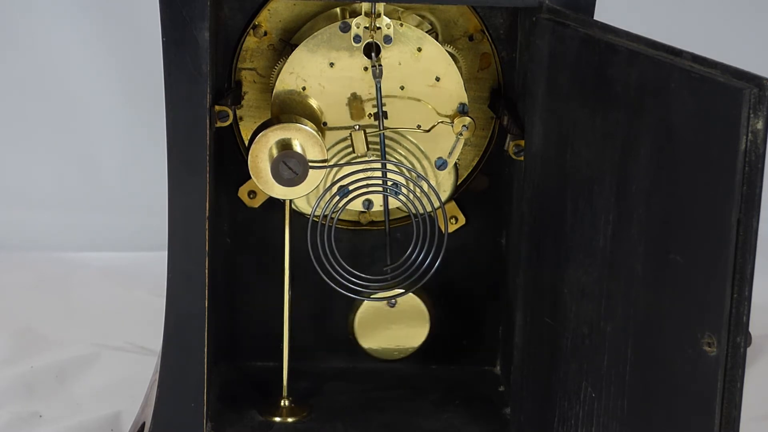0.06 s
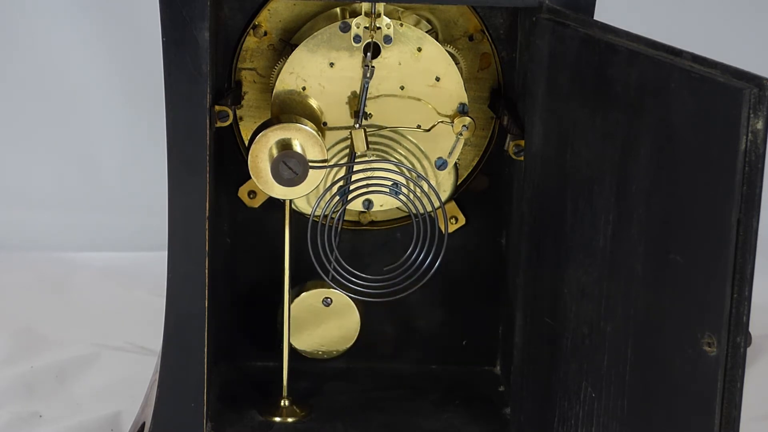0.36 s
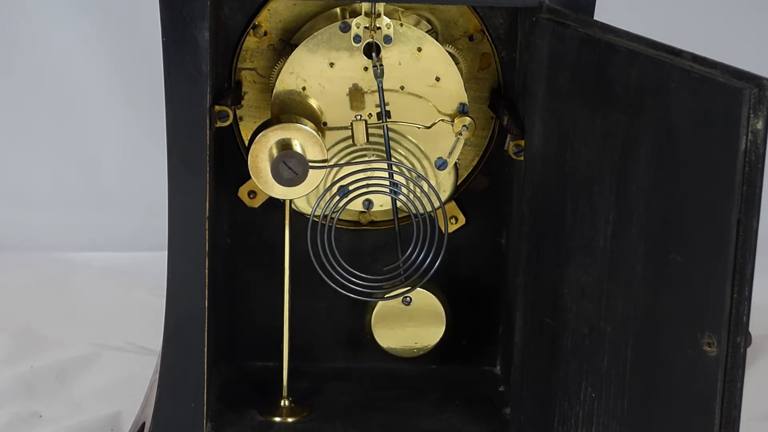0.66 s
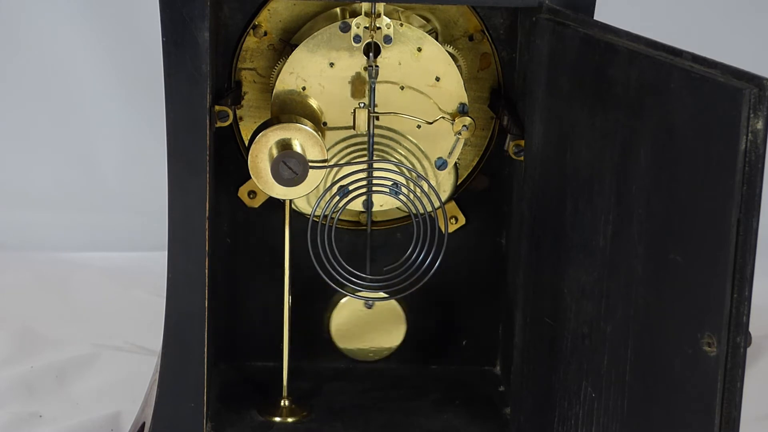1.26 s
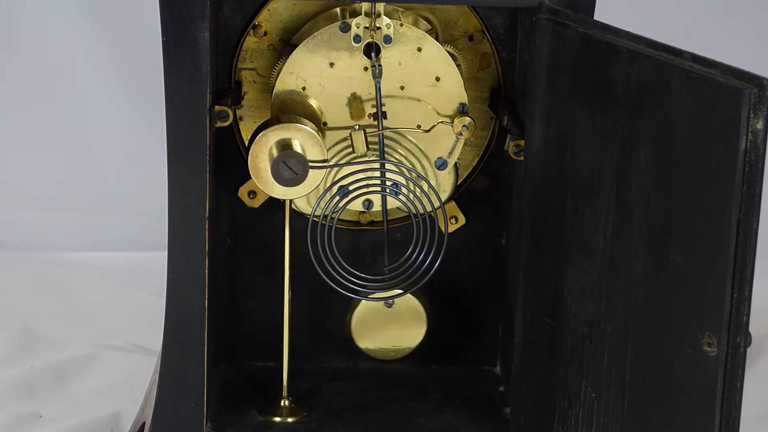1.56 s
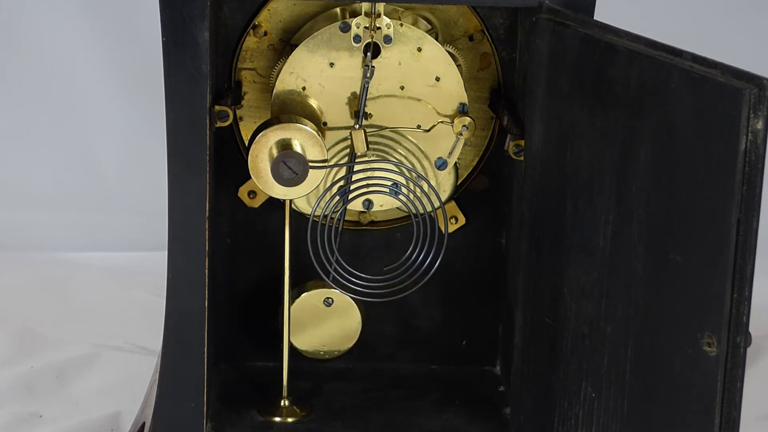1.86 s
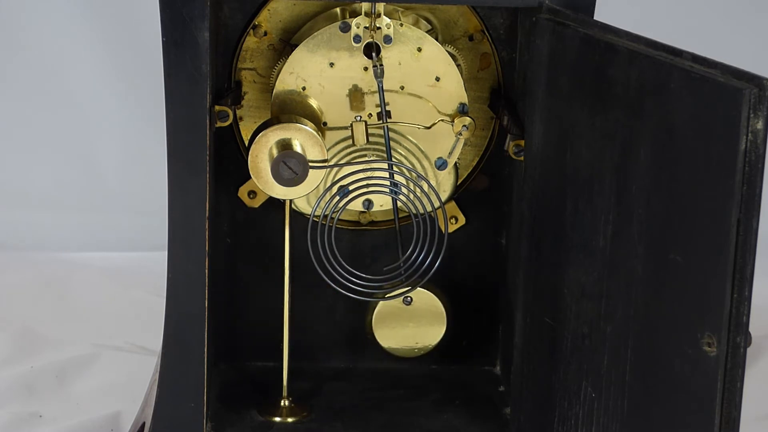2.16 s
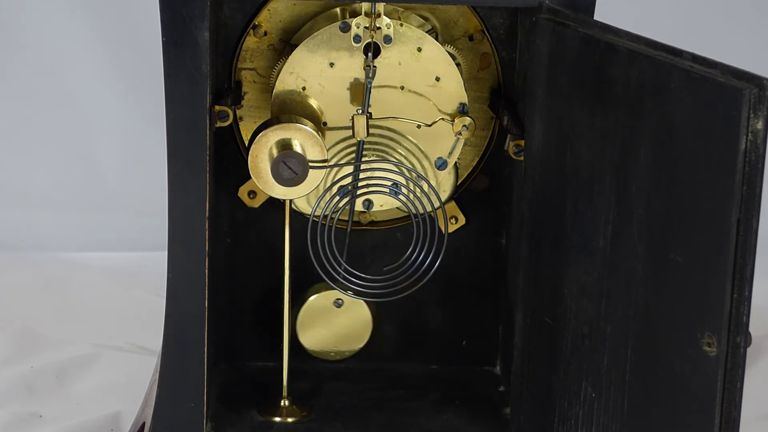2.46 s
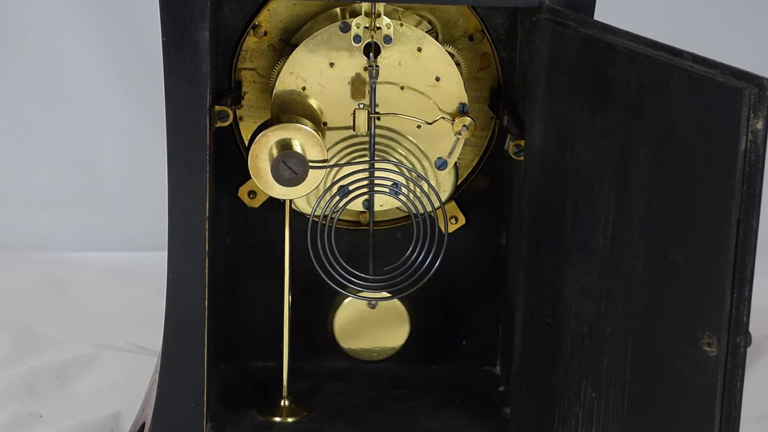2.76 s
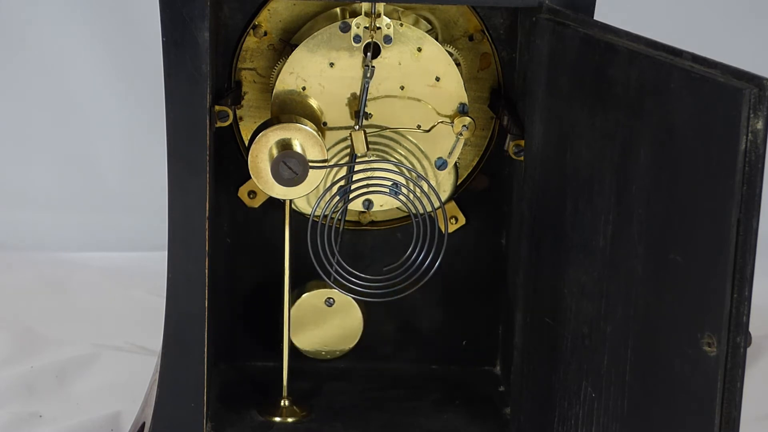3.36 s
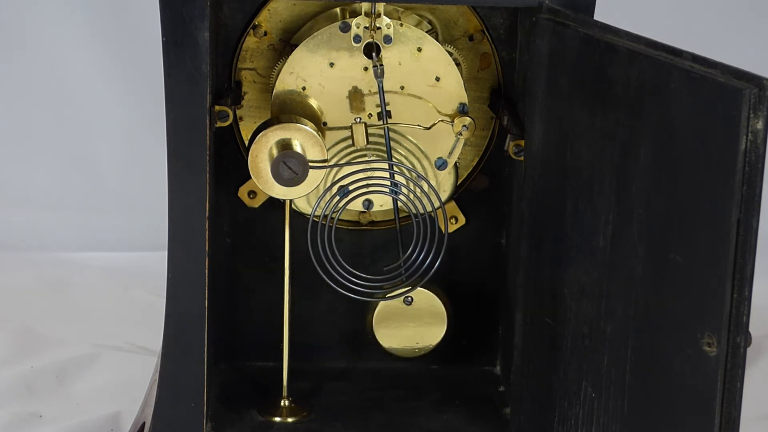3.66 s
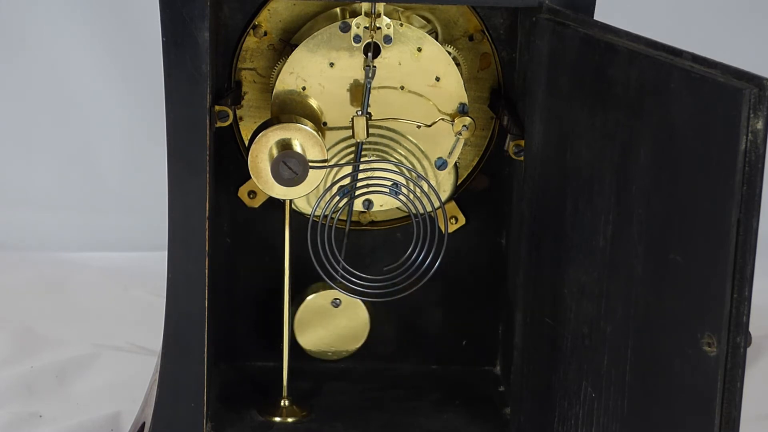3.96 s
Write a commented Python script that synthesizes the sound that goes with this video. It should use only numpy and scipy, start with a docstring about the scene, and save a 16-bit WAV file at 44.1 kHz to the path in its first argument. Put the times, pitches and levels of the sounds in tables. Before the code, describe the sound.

A mantel clock strikes on a coiled steel gong, already ringing, then hit twice more. A sharp lever clack follows each blow, while the mechanism whirrs and ticks quickly, close up in a small room.

```python
"""A small room, close to the open back of a mantel clock striking the hour.
The brass striking train whirrs and ticks quickly throughout. A coiled steel gong, already ringing,
takes two more blows from a padded hammer. Each blow adds to the ringing partials, thuds and thumps
the wooden case. Just after it the hammer lever clacks and a low hum swells briefly."""
import sys
import numpy as np
from scipy import signal
from scipy.fft import rfft, irfft
from scipy.io import wavfile
from scipy.ndimage import uniform_filter1d

SR = 44100
rng = np.random.default_rng(int(sys.argv[2]) if len(sys.argv) > 2 else 0)


def waveform_to_disk(signal):
    """Save audio, clipped to [-1, 1], as 16-bit WAV at the path in sys.argv[1]."""
    frames = np.transpose(np.atleast_2d(signal))
    scaled = np.clip(frames, -1, 1) * 32767
    samples = np.round(scaled).astype(np.int16)
    wavfile.write(sys.argv[1], SR, samples)


N = 176400


def undb(db):
    return 10 ** (np.asarray(db) / 20)


def unit_rms(x):
    return x / np.sqrt(np.mean(x ** 2))


def fade(t, t60_s):
    """Exponential decay from t = 0, silent before."""
    return (t >= 0) * np.exp(-np.log(1000) * np.maximum(t, 0) / t60_s)


def rise(t, rise_s):
    """Exponential build-up from t = 0."""
    return 1 - np.exp(-np.maximum(t, 0) / rise_s)


def wander(rate_hz):
    """Smooth random drift, rms 1."""
    hold = int(SR / rate_hz)
    steps = np.repeat(rng.standard_normal(N // hold + 1), hold)
    return unit_rms(uniform_filter1d(steps, hold)[:N])


# Stereo width of the noises. Each row: frequency in Hz, side-to-mid ratio in dB.
WIDTH = [(50, -11), (250, -11.5), (1500, -17), (4000, -4.5), (8000, -9.5), (12000, -4.5)]


def colour(pair, spectrum, resonances=()):
    """Shape a mid/side pair by a spectrum and resonances into left and right, rms 1."""
    hz = np.maximum(np.fft.rfftfreq(N, 1 / SR), 1)

    def curve(rows):
        points_hz, points_db = np.array(rows).T
        return undb(np.interp(np.log(hz), np.log(points_hz), points_db))

    gain = curve(spectrum)
    for centre_hz, width_hz, peak_db in resonances:
        gain *= 1 + (undb(peak_db) - 1) / (1 + (2 * (hz - centre_hz) / width_hz) ** 2)
    mid, side = rfft(pair) * gain
    side *= curve(WIDTH)
    return unit_rms(irfft(np.array([mid + side, mid - side]), N))


# Whirr spectrum. Each row: frequency in Hz, relative density in dB.
WHIRR_SPECTRUM = [(45, -15), (100, 1), (200, 1), (300, -0.5), (420, -3.5), (800, -3), (1300, -2.5),
                  (1900, 3), (2350, -2), (2750, -11), (3400, -10), (4000, 0.5), (4400, -2.5), (5000, 0),
                  (6200, -1.5), (8000, -0.5), (10000, 0), (12200, -6), (13400, -8), (14400, -11.5),
                  (15500, -15)]
# Resonances of the train's plates. Each row: centre in Hz, width in Hz, boost in dB.
PLATE_RESONANCES = [(962, 47, 11.8), (1127, 50, 5.4), (1646, 46, 13.5), (1930, 24, 2.1), (4960, 82, 5.4),
                    (7000, 210, 6.6), (7560, 60, 4.3), (8380, 100, 4.4), (9680, 180, 3.2)]


def striking_train(whirr_db=-44, teeth_db=-52.5, clicks_per_s=170, scatter_db=2.5):
    """The spinning fly and wheels: a fluttering whirr with tiny clicks of meshing teeth."""
    whirr = colour(rng.standard_normal((2, N)), WHIRR_SPECTRUM, PLATE_RESONANCES)
    clicks = (rng.random(N) < clicks_per_s / SR) * undb(scatter_db * rng.standard_normal(N))
    polarity = np.sign(rng.standard_normal((2, N)))
    teeth = colour(clicks * polarity, WHIRR_SPECTRUM, PLATE_RESONANCES)
    flutter_db = 0.93 * wander(rate_hz=45) + 0.35 * wander(rate_hz=6.67)
    return (undb(whirr_db) * whirr + undb(teeth_db) * teeth) * undb(flutter_db)


# Gong modes. Each row: frequency in Hz, T60 in seconds, relative level per blow in dB,
# relative level still ringing at the start in dB, left minus right in dB.
GONG_MODES = [(105.12, 5.2, -67, -78, 1), (146.0, 16.0, -66, -71, 0), (172.88, 20.0, -55, -62, 0),
              (228.71, 20.0, -60, -80, 0), (281.48, 17.4, -65, -75, 0), (288.26, 16.8, -62, -62, 0),
              (289.56, 4.3, -48, -50, 0), (401.19, 1.7, -45, -49, 0), (523.68, 7.6, -67, -50, 1),
              (528.91, 20.0, -54, -55, 1), (672.43, 20.0, -60, -49, -1), (835.27, 20.0, -47, -46, 0),
              (1014.25, 17.3, -38, -43, 2), (1204.81, 2.6, -35, -43, -1), (1413.0, 12.5, -50, -46, -2),
              (1632.29, 15.1, -39, -43, -1), (1864.85, 10.7, -53, -62, -1), (2364.53, 4.8, -37, -42, 3),
              (2636.24, 6.8, -57, -58, 5), (2917.22, 7.2, -57, -60, 0), (3210.51, 3.3, -53, -56, 8),
              (3512.57, 1.9, -37, -42, 1), (3826.79, 3.2, -39, -43, -2), (4152.92, 3.9, -55, -58, 3),
              (4459.25, 5.5, -56, -61, -1), (4499.77, 2.9, -53, -57, 5), (4838.92, 3.6, -48, -55, -1),
              (5205.95, 3.1, -48, -54, 3), (5583.11, 3.8, -58, -62, 1), (5967.65, 3.2, -53, -60, -3),
              (6363.09, 2.6, -54, -59, -1)]
# Hammer blows. Each row: start in seconds, strength in dB.
BLOWS = [(1.455, 0), (3.015, -2)]


def gong(t, gain_db=6.5, rise_cycles=14, spread_rad=0.3):
    """Slowly fading steel partials; a blow strengthens or weakens each one, as their phases meet."""
    out = np.zeros((2, N))
    skews_rad = spread_rad * rng.uniform(-1, 1, len(GONG_MODES))
    for (hz, t60_s, blow_db, ringing_db, pan_db), skew_rad in zip(GONG_MODES, skews_rad):
        ring = undb(ringing_db) * fade(t, t60_s) * np.exp(2j * np.pi * hz * t)
        for start_s, strength_db in BLOWS:
            age_s = t - start_s
            envelope = rise(age_s, 0.002 + rise_cycles / hz) * fade(age_s, t60_s)
            ring += undb(blow_db + strength_db) * envelope * np.exp(2j * np.pi * hz * age_s)
        for ear, sign in enumerate((1, -1)):
            out[ear] += undb(sign * pan_db / 2) * np.imag(ring * np.exp(1j * sign * skew_rad))
    return undb(gain_db) * out


# Blows, including one just before the start. Each row: start in seconds, strength in dB.
ALL_BLOWS = [(-0.045, -2.5)] + BLOWS
# Case modes. Each row: frequency in Hz, level for a 0 dB blow in dB, T60 in seconds.
CASE_MODES = [(324.2, -29.5, 0.77), (338, -30, 0.1), (955, -39, 0.083), (1670, -50, 0.49),
              (3205, -42, 0.26), (4165, -40, 0.65)]


def wooden_case(t, rise_s=0.0083):
    """Each blow sets off short resonances of the case and gong stand."""
    out = np.zeros(N)
    for start_s, strength_db in ALL_BLOWS:
        age_s = t - start_s
        for hz, level_db, t60_s in CASE_MODES:
            envelope = rise(age_s, rise_s) * fade(age_s, t60_s)
            out += undb(level_db + strength_db) * envelope * np.sin(2 * np.pi * hz * age_s)
    return out


def knocks(t, contacts, spectrum, resonances, t60_s, room_db, room_t60_s):
    """Contacts set off a dense, quickly damped rattle with a room tail; their powers add."""
    power = np.zeros(N)
    for start_s, level_db in contacts:
        direct = fade(t - start_s, t60_s)
        room = undb(room_db) * fade(t - start_s, room_t60_s)
        power += undb(level_db) ** 2 * (direct ** 2 + room ** 2)
    return np.sqrt(power) * colour(rng.standard_normal((2, N)), spectrum, resonances)


# Thud spectrum. Each row: frequency in Hz, relative density in dB.
THUD_SPECTRUM = [(60, -4), (160, -9), (350, 8), (600, -4), (1000, -5), (1700, 0), (2700, -13), (4100, -9),
                 (6000, -10), (15000, -35)]


def hammer_thuds(t, gain_db=-35):
    """The padded hammer lands with a dull thud that lingers in the room."""
    return undb(gain_db) * knocks(t, ALL_BLOWS, THUD_SPECTRUM, PLATE_RESONANCES,
                                  t60_s=0.036, room_db=0, room_t60_s=0.98)


# Lever contacts and rebounds. Each row: start in seconds, level in dB.
CLACKS = [(.027, -21), (0.0302, -19), (.038, -21), (.085, -32.5), (1.5685, -18.5), (1.574, -23),
          (1.58, -26), (1.608, -32), (1.62, -35), (3.1224, -19), (3.13, -24), (3.135, -19), (3.175, -37)]
# Spectra of a clack and of its leading snap. Each row: frequency in Hz, relative density in dB.
CLACK_SPECTRUM = [(40, -17), (150, -15), (500, -13.5), (1000, -2.5), (1700, -2.5), (2700, -7.5), (4500, 2),
                  (6000, -4), (7500, -1.5), (10000, 0.5), (13000, -6.5), (15500, -11)]
SNAP_SPECTRUM = [(200, -31), (2500, -7.5), (5500, -21), (8000, 5), (11000, 1.5), (15500, -4.5)]
# Resonances of the lever and wheels. Each row: centre in Hz, width in Hz, boost in dB.
BRASS_RESONANCES = [(4900, 100, -3), (5700, 68, 12), (6460, 93, 14.5), (7020, 130, 9), (7530, 76, 11),
                    (8320, 120, 13.5), (8770, 160, 7), (8900, 120, 6), (10100, 110, -2), (9900, 80, 11),
                    (10940, 50, 6), (12100, 150, 9), (14000, 250, 2)]


def lever_clacks(t, snap_gain_db=-0.5, snap_t60_s=0.013):
    """The hammer lever hits and rebounds: each contact is a hard snap and a brassy rattle."""
    rattle = knocks(t, CLACKS, CLACK_SPECTRUM, BRASS_RESONANCES,
                    t60_s=0.049, room_db=-15.5, room_t60_s=0.44)
    snap_envelope = sum(undb(db + snap_gain_db) * fade(t - start_s, snap_t60_s) for start_s, db in CLACKS)
    return rattle + snap_envelope * colour(rng.standard_normal((2, N)), SNAP_SPECTRUM)


def gong_hum(t, hz=289.5, level_db=-44, from_s=0.1, until_s=0.304, edge_s=0.0069):
    """The gong's low hum swells for a moment after each blow."""
    out = np.zeros(N)
    for start_s, _ in ALL_BLOWS:
        age_s = t - start_s
        swell = (np.tanh((age_s - from_s) / edge_s) - np.tanh((age_s - until_s) / edge_s)) / 2
        out += swell * np.sin(2 * np.pi * hz * age_s)
    return undb(level_db) * out


# Ticks of the train. Each row: start in seconds, level in dB.
TICKS = [(.1825, -37), (.673, -42), (0.8475, -43), (1.016, -40), (1.19, -41), (1.4277, -39), (1.873, -36),
         (2.0403, -34.5), (2.206, -37.5), (2.383, -39), (2.559, -38.5), (2.7436, -37.5), (2.9865, -43),
         (3.066, -43), (3.2705, -33.5), (3.44, -33.5), (3.6087, -37.5), (3.7823, -40), (3.9573, -36)]
# Tick spectrum. Each row: frequency in Hz, relative density in dB.
TICK_SPECTRUM = [(150, -4), (600, -1.5), (1700, -3), (2900, -6), (4500, -1.5), (8000, 2.5), (11000, 2),
                 (13000, -8), (15500, -20)]


def train_ticks(t):
    """Light contacts in the running train ring its plates."""
    return knocks(t, TICKS, TICK_SPECTRUM, PLATE_RESONANCES, t60_s=0.07, room_db=-0.5, room_t60_s=0.16)


def scene():
    """Stereo sum of the clock's sounds."""
    t = np.arange(N) / SR
    return (striking_train() + gong(t) + wooden_case(t) + hammer_thuds(t)
            + lever_clacks(t) + gong_hum(t) + train_ticks(t))


def record(dry, low_cut_hz=30, high_cut_hz=15250):
    """Roll off the deepest bass and cut the top steeply."""
    highpass = signal.butter(2, low_cut_hz, "high", fs=SR, output="sos")
    lowpass = signal.ellip(8, 0.2, 80, high_cut_hz, fs=SR, output="sos")
    return signal.sosfilt(lowpass, signal.sosfilt(highpass, dry))


dry = scene()
out = record(dry)
waveform_to_disk(out)
```